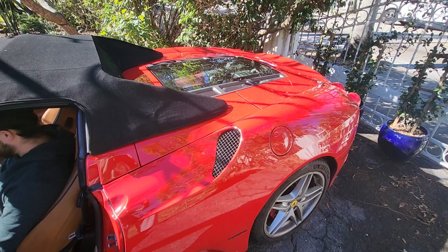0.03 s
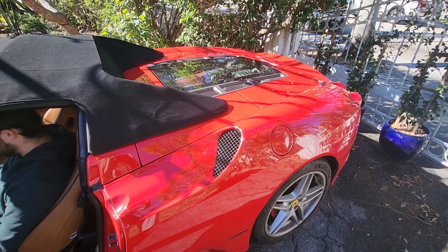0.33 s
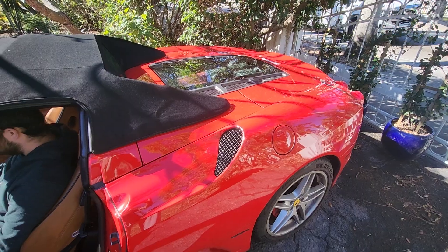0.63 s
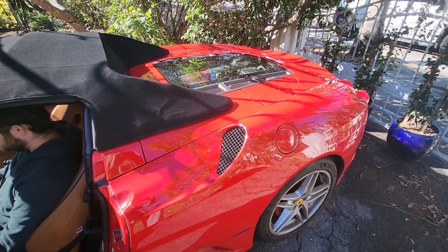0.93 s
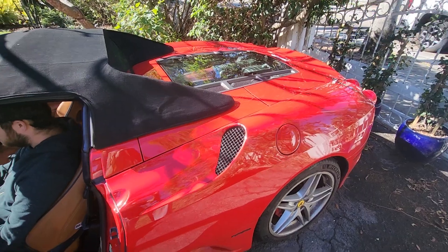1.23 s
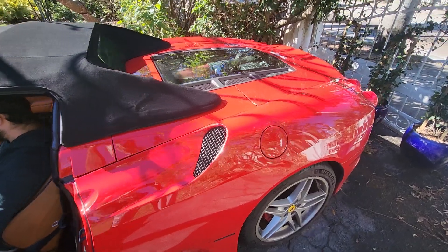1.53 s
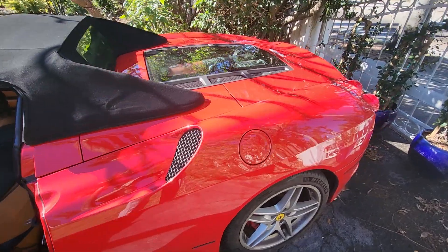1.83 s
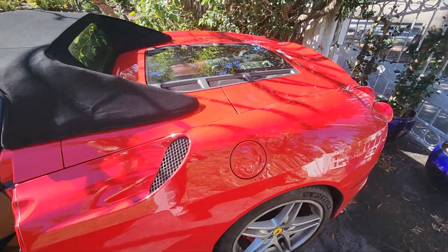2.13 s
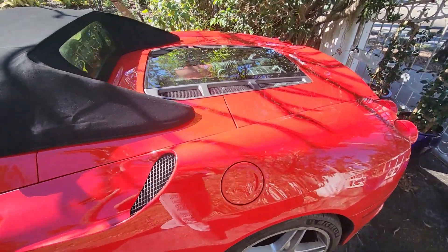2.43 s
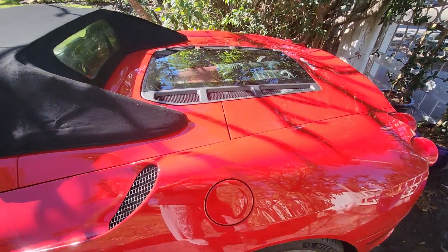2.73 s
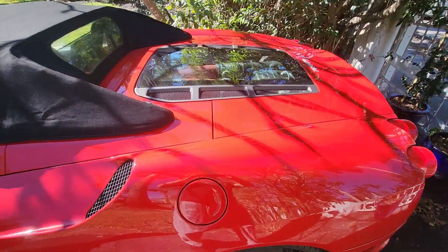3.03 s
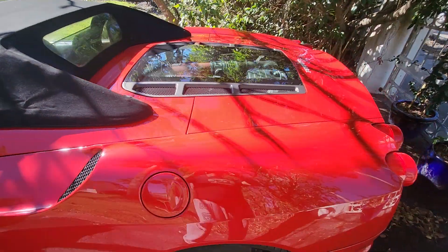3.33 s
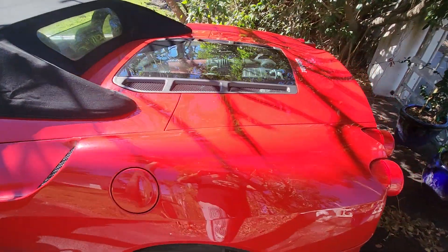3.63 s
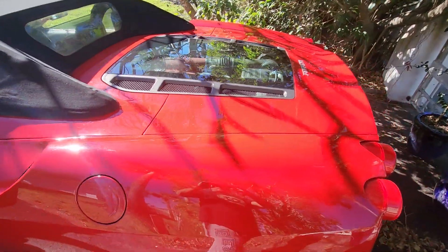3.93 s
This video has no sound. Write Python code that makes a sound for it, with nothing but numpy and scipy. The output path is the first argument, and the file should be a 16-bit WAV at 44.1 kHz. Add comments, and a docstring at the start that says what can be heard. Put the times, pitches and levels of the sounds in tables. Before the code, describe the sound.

A sports car engine starts, heard close to its rear wing. At about 0.1 seconds the starter clacks in and cranks with a fast, pulsing grind and whine. Near 0.8 seconds the first firings thump, and the engine flares with a loud bark around 1 second. By 1.5 seconds it sinks to a steady, droning idle with light hiss and ticking, holding until the end at 4 seconds.

```python
"""A starter clacks in and grinds through eight compressions: a V8 sports car starting from cold
on a driveway, with the microphone beside its rear wing. The first cylinders thump into the exhaust,
then the engine flares with a bark and sinks to a droning idle under the hiss and tick of its valve
gear. One crankshaft speed times the running engine, four firings to a turn."""
import sys
import numpy as np
from scipy import signal
from scipy.fft import rfft, irfft
from scipy.io import wavfile
from scipy.ndimage import uniform_filter1d

SR = 44100
rng = np.random.default_rng(int(sys.argv[2]) if len(sys.argv) > 2 else 0)


def transcribe(signal):
    """Save signal, clipped to [-1, 1], as a 16-bit WAV file at the path in sys.argv[1]."""
    frames = np.atleast_2d(signal).T
    limited = np.clip(frames, -1, 1)
    pcm = np.round(limited * 32767).astype(np.int16)
    wavfile.write(sys.argv[1], SR, pcm)


N = 176400

# crankshaft speed through flare and idle (time [s], speed [turns/s])
CRANK_SPEED = [(.75, 20), (.9, 41.2), (.95, 50.8), (1.03, 52), (1.12, 54.4), (1.2, 50.5), (1.3, 48.9),
               (1.5, 42.4), (1.94, 44.7), (2.06, 42), (2.12, 44.7), (2.6, 44.1), (3.3, 44.3), (4, 43.9)]
# how hard the engine works (time [s], pipe level [dB], rumble level [dB], engine bay level [dB])
ENGINE_EFFORT = [(.72, -70, -39, -38), (.76, -34.5, -23.5, -35), (.89, -33, -24.5, -35.5),
                 (.93, -21.5, -14, -29.5), (.99, -24.5, -12.5, -33), (1.025, -28, -22.5, -37.5),
                 (1.12, -29.5, -30.5, -34), (1.17, -32.5, -21.5, -41), (1.32, -36, -22, -39),
                 (1.65, -37.5, -25, -40), (2.05, -38.5, -28, -41.5), (2.2, -42, -26, -41),
                 (2.9, -44.5, -30, -42), (4, -42, -31, -41)]

STARTER_ON_S, FIRINGS_PER_TURN = 0.069, 4
RUNNING_FADE_S = (1, 1.043)  # drone and tappets come in over this span
PIPE_WIDTH, BAY_WIDTH = 0.5, 1  # side over mid
LOW_PAN_DB, PIPE_PAN_DB, BAY_PAN_DB = 2, 2, 4  # left over right at the microphone


def undb(db):
    """Decibels to gain."""
    return 10 ** (np.asarray(db) / 20)


def unit(x):
    """Scale to rms 1."""
    return x / np.sqrt(np.mean(x ** 2))


def curve(table, column=1):
    """One column of a table, joined by straight lines in time."""
    rows = np.array(table)
    return np.interp(np.arange(N) / SR, rows[:, 0], rows[:, column])


def walk(rate_hz):
    """Smooth random wander with a spread near 1."""
    hold = int(SR / rate_hz)
    steps = np.repeat(rng.standard_normal(N // hold + 1), hold)
    return uniform_filter1d(uniform_filter1d(steps, hold), hold)[:N]


def noise():
    """Two unrelated white noises."""
    return rng.standard_normal((2, N))


def colour(x, outline):
    """Filter by a (frequency [Hz], level [dB]) outline that falls steeply beyond its ends; rms 1."""
    hz, db = np.array(outline).T
    log_f = np.log(np.maximum(np.fft.rfftfreq(2 * N, 1 / SR), 1))
    beyond = np.maximum(np.log(hz[0]) - log_f, 0) + np.maximum(log_f - np.log(hz[-1]), 0)
    response = undb(np.interp(log_f, np.log(hz), db) - 36 * beyond)
    return unit(irfft(rfft(x, 2 * N) * response)[..., :N])


def ring(x, modes):
    """Ring a set of (frequency [Hz], width [Hz], level [dB]) resonances; rms 1."""
    f = np.maximum(np.fft.rfftfreq(2 * N, 1 / SR), 1)
    response = sum(undb(db) / (1 + 1j * hz / width * (f / hz - hz / f)) for hz, width, db in modes)
    return unit(irfft(rfft(x, 2 * N) * response)[..., :N])


def pulses(phase, scatter_db):
    """A click of random size at each whole step of the phase, and that size held through the cycle."""
    cycle = phase.astype(int)
    size = undb(scatter_db * np.clip(rng.standard_normal(N), -2, 2))[cycle]
    return np.diff(cycle, prepend=0) * size, size


def accents(firings, levels_db):
    """A gain for each firing, in a pattern that repeats every turn."""
    return undb(levels_db)[firings.astype(int) % FIRINGS_PER_TURN]


def cycle_decay(phase, cycles):
    """A decay that restarts at each whole step of the phase."""
    return np.exp(-(phase % 1) / cycles)


def burst(age, length, rise_s, fall_s):
    """Attack, hold and release."""
    return np.clip(age / rise_s, 0, 1) * np.exp(-np.maximum(age - length, 0) / fall_s)


def place(pair, width, pan_db):
    """Mid and side signals to the microphone's left and right."""
    mid, side = pair
    return np.array([mid + width * side, mid - width * side]) * undb([[pan_db / 2], [-pan_db / 2]])


def engine_bay(t, turns, firings):
    """Belts and intake hiss, swelling once a turn; valves tick; loose covers chatter on and off."""
    # hiss of the bay (frequency [Hz], relative level [dB])
    hiss_spectrum = [(470, -10), (800, 0), (1420, -2.5), (2240, -7.5), (2630, -16.5), (3330, -15.5),
                     (4110, -10.5), (6510, -10.5), (7840, -4), (9680, -25.5), (11700, -14.5),
                     (15500, -17.5)]
    # resonances of the loose covers (frequency [Hz], width [Hz], relative level [dB])
    chatter_modes = [(1550, 130, 1), (1973, 390, 0)]
    # brief clatters that lift the whole bay (time [s], level [dB])
    clatters = [(1.194, -38), (1.235, -38), (1.559, -36), (1.775, -43.5), (2.64, -43)]
    _, size = pulses(firings, scatter_db=4)
    ticks = unit(size * accents(firings, (-0.5, 3, 6.5, -9)) * cycle_decay(firings, 0.14))
    hiss = (noise() + undb(-17.5) * ticks * noise()) * (1 + 0.18 * np.cos(2 * np.pi * turns))
    chatter = ring(ring(noise(), chatter_modes), chatter_modes)
    chatter *= undb(-19.5 + 7.5 * np.minimum(walk(26), 2))
    clatter = sum(undb(db) * np.exp(-((t - middle) / 0.013) ** 2) for middle, db in clatters)
    level = np.hypot(undb(curve(ENGINE_EFFORT, column=3) - 2), clatter)
    return level * place(colour(hiss, hiss_spectrum) + chatter, BAY_WIDTH, BAY_PAN_DB)


def tappets(t, firings):
    """Each valve strike rings the cam covers a little differently."""
    # cam cover resonances (frequency [Hz], width [Hz], level [dB])
    cover_modes = [(2083, 82, -54), (3940, 106, -64), (4586, 150, -61)]
    covers = np.zeros((2, N))
    for hz, width, db in cover_modes:
        strikes, _ = pulses(firings, scatter_db=4.5)
        covers += undb(db) * ring(strikes * noise(), [(hz, width, 0)])
    return place(covers * np.interp(t, RUNNING_FADE_S, [0, 1]), BAY_WIDTH, BAY_PAN_DB)


def squeaks(t):
    """Belts and covers chirp briefly as the engine shakes: narrow, scratchy tones that slide."""
    # chirps (middle [s], length [s], pitch [Hz], slide [Hz/s], level [dB])
    chirps = [(0.857, .025, 1670, 4007, -27.5), (0.97, .014, 4800, 10, -28.5), (.988, 0.014, 1856, -2, -26),
              (1.27, .08, 1860, -2, -38.5), (1.562, 0.045, 1300, -9000, -39), (3.61, 0.016, 2030, 3, -37)]
    grips_per_s = 510
    out = np.zeros((2, N))
    for middle, length, hz, slide, db in chirps:
        phase = 2 * np.pi * np.cumsum(hz + slide * np.clip(t - middle, -length, length)) / SR
        scratch = np.array([walk(grips_per_s) * np.cos(phase) + walk(grips_per_s) * np.sin(phase)
                            for _ in range(2)])
        out += undb(db) * np.exp(-(2 * (t - middle) / length) ** 2) * scratch
    return place(out, BAY_WIDTH, BAY_PAN_DB)


def starter(t):
    """The solenoid clacks; at each compression the teeth bite, grind and whine down; pistons pump air."""
    # load on the starter (start [s], length [s], level [dB], first tooth rate [Hz], whine share [0-1])
    compressions = [(0.111, 0.05, -1.5, 1251, 0.61), (0.208, 0.035, 0, 1405, 0.48),
                    (0.287, 0.038, 0, 1474, .6), (0.357, 0.038, -0.5, 1444, 0.54),
                    (0.432, .043, -1, 1481, 0.56), (0.509, .046, 0, 1383, 0.18),
                    (0.587, 0.045, 0, 1431, 0.45), (0.669, 0.045, 0, 1423, .5)]
    # starter and bell housing resonances (frequency [Hz], width [Hz], relative level [dB])
    housing_modes = [(517, 120, -10), (967, 20, 4.5), (1101, 15, 9.5), (1302, 41, 4.5), (1950, 230, -11),
                     (2390, 30, -3), (3240, 26, 0), (3650, 65, -6), (4290, 50, -6)]
    # tooth scrape, gear whine, hard tooth strikes, pumped air (frequency [Hz], relative level [dB])
    grind_spectrum = [(400, -42), (511, -7), (873, -4), (957, 2), (1300, -2.5), (1660, -5), (2030, -6.5),
                      (2840, -14.5), (4420, -11.5), (6280, -16.5), (7910, -15), (9500, -35), (12500, -30),
                      (15500, -40)]
    whine_spectrum = [(900, 18), (1300, 0), (2100, 12), (2650, -10), (3300, 7.5), (4500, -23), (6000, -10),
                      (8000, -32)]
    bite_spectrum = [(4400, 7), (8000, -12.5), (9500, -18), (12500, -4.5)]
    chug_spectrum = [(20, 3), (32, 1.5), (70, 0.5), (120, -2.5), (220, -9), (380, -18), (550, -13),
                     (850, -18.5), (1600, -41)]
    load_sag_db_per_s, tooth_sag_hz_per_s, load_fall_s = 87, 4600, 0.014
    free_tooth_hz, free_load_db, off_s, release_s = 1551.0, -12, 0.76, 0.27
    load, whine_level, tooth_hz = np.zeros(N), np.zeros(N), np.full(N, free_tooth_hz)
    for start, length, db, hz, whine_share in compressions:
        age = np.maximum(t - start, 0)
        stroke = burst(age, length, rise_s=0.013, fall_s=load_fall_s)
        stroke *= undb(db - load_sag_db_per_s * age)
        load += stroke
        whine_level += whine_share * stroke
        loaded = (age > 0) & (age < length + load_fall_s)
        tooth_hz = np.where(loaded, hz - tooth_sag_hz_per_s * age, tooth_hz)
    mesh = np.cumsum(tooth_hz * (1 + 0.014 * walk(900))) / SR  # pinion teeth on the flywheel
    teeth, _ = pulses(mesh, scatter_db=0)
    scrape = noise() * cycle_decay(mesh, 0.96)
    grind = undb(-30.5) * ring(scrape, housing_modes) + undb(-27.5) * colour(scrape, grind_spectrum)
    whine = undb(-22.5) * colour(teeth, whine_spectrum) * whine_level
    bite = undb(-34.5) * colour(scrape, bite_spectrum) * load ** 2
    clack = undb(-13) * np.exp(-np.maximum(t - STARTER_ON_S, 0) / 0.033)
    gears = grind * (np.hypot(load, undb(free_load_db)) + clack) + bite
    gears += np.array([whine, np.roll(whine, 90)])  # a late side signal widens the whine
    chug = undb(-25) * colour(noise(), chug_spectrum) * (1 + 0.24 * (load - 0.5))
    engaged = np.exp(-np.maximum(t - off_s, 0) / release_s)
    return engaged * (place(gears, width=0.83, pan_db=3.5) + place(chug, width=0.11, pan_db=LOW_PAN_DB))


def first_firings(t):
    """Each first firing is a pressure thump that dies away in the silencer."""
    # cylinders catching (time [s], level [dB])
    catches = [(0.7567, -0.5), (0.803, -0.5), (0.833, -5.5), (0.875, -4), (0.913, -1.5), (0.932, -5),
               (0.954, -7.5)]
    # silencer resonances (frequency [Hz], decay [s], relative level [dB])
    silencer_modes = [(36, 0.027, -14), (72.5, 0.013, 4), (114.6, 0.01, -2), (209, 0.01, -11)]
    thumps = np.zeros(N)
    for start, db in catches:
        age = np.maximum(t - start, 0)
        attack = 1 - np.exp(-age / 0.0028)
        for hz, decay, mode_db in silencer_modes:
            thumps -= undb(db + mode_db) * np.sin(2 * np.pi * hz * age) * np.exp(-age / decay) * attack
    return place([thumps, np.zeros(N)], width=0, pan_db=LOW_PAN_DB)


def exhaust(firings):
    """Uneven firings and their puffs of gas ring the pipes, rumble in the silencer, rasp at the outlet."""
    # exhaust pipe resonances (frequency [Hz], width [Hz], relative level [dB])
    pipe_modes = [(275, 27, -22), (329, 18, 14), (466, 15, 13.5), (558, 31, 17), (614, 35, 9.5),
                  (675, 12, -5.5), (840, 27, -11)]
    # blow-down hiss and silencer rumble (frequency [Hz], relative level [dB])
    rasp_spectrum = [(600, -29), (1000, -41), (1600, 3), (2150, -3), (2700, -16), (5000, -6.5), (9000, -50)]
    rumble_spectrum = [(24, -7), (36, 2), (70, -5), (130, -13), (200, -1), (310, -12), (390, -22.5),
                       (700, -24)]
    clicks, size = pulses(firings, scatter_db=1.5)
    strength = accents(firings, (5, -1, 0.5, -2.5))
    puffs = unit(strength * size * cycle_decay(firings, 1))
    mid, side = 0.97 * puffs * noise()
    mid += 0.4 * unit(clicks * strength)
    side = unit(side) * np.std(mid)
    drive = signal.sosfilt(signal.butter(2, 260, "high", fs=SR, output="sos"), [mid, side])
    pipes = place(ring(drive, pipe_modes), PIPE_WIDTH, PIPE_PAN_DB)
    rasp_level = undb(-12 + 5.5 * walk(24.3))
    rasp = rasp_level * place(colour(puffs * noise(), rasp_spectrum), width=1, pan_db=PIPE_PAN_DB)
    rumble = place(colour(puffs * noise(), rumble_spectrum), width=0.17, pan_db=LOW_PAN_DB)
    rumble *= undb(curve(ENGINE_EFFORT, column=2))
    return (pipes + rasp) * undb(curve(ENGINE_EFFORT, column=1)) + rumble


def barks(t, firings):
    """Under load in the flare the firings steepen into cracks, one cylinder loudest in each turn."""
    # surges of the flare (start [s], length [s], level [dB])
    surges = [(0.91, 0.075, -30), (1.047, 0.059, -21)]
    # tone of the bark (frequency [Hz], relative level [dB])
    bark_spectrum = [(120, -12), (300, 1), (390, -10), (450, -4.5), (495, -21), (555, 8), (610, -0.5),
                     (790, -1), (900, -10), (1020, -31), (1500, -23), (2000, -20.5)]
    loud_firing_s = 1.078  # the pattern is shifted so that the loudest cylinder fires here
    firings = firings + FIRINGS_PER_TURN - np.interp(loud_firing_s, t, firings) % FIRINGS_PER_TURN
    clicks, _ = pulses(firings, scatter_db=1.5)
    strength = accents(firings, (4.5, -5, -12, -12))
    gas = 0.82 * unit(strength * cycle_decay(firings, 0.61)) * noise()
    crack = unit(clicks * strength)
    bark = colour(gas + np.array([crack, np.roll(crack, 40)]), bark_spectrum)
    effort = sum(undb(db) * burst(t - start, length, rise_s=0.018, fall_s=0.04)
                 for start, length, db in surges)
    return effort * place(bark, PIPE_WIDTH, PIPE_PAN_DB)


def drone(t, turns):
    """The regular part of the exhaust pulses: crank orders, rough in the flare and clean at idle."""
    # exhaust tones (order [cycles/turn], flare [dB], settling [dB], idle [dB], nearer the tail [dB])
    crank_orders = [(1, -8, -6.5, -11, -4.5), (2, -1, -7, -9.5, -11.5), (2.5, -24, -41, -24, -33),
                    (3, -7.5, -4, -5.5, -4.5), (3.5, -29, -35, -20, -17), (4, -6, -2.5, 1, .5),
                    (5, -13, -52, -21.5, -26), (6, -19.5, -11.5, -12.5, -11), (8, -28, -27, -36, -19.5),
                    (10, -22, -31.5, -24, -20)]
    stages_s = (1.118, 1.448, 2.402, 3.9)  # when each level column holds
    left_lag_s = 0.00018  # the pulses reach the left of the microphone late
    heard_turns = np.array([turns - left_lag_s * curve(CRANK_SPEED), turns]) + 0.009 * walk(140)
    rough_db = np.interp(t, stages_s[:2], [4, 0])
    smear = np.interp(t, stages_s[:2], [-0.038, -0.1533])  # the silencer spreads each pulse in time
    out = np.zeros((2, N))
    for order, *stage_db in crank_orders:
        db = np.interp(t, stages_s, stage_db)
        waver_db = np.interp(db, [-22, -8], [1.1, 0.2]) + rough_db  # weak orders waver more
        pan_db = min(order, PIPE_PAN_DB) * np.array([[0.5], [-0.5]])
        phase = 2 * np.pi * order * heard_turns - smear * order ** 2
        out -= undb(db + pan_db + waver_db * walk(39.96)) * np.cos(phase)
    return out * np.sqrt(2) * undb(-17) * np.interp(t, RUNNING_FADE_S, [0, 1])


def scene():
    """The car from beside its rear wing: starter, first firings, then the running engine."""
    t = np.arange(N) / SR
    turns = np.cumsum(curve(CRANK_SPEED) * (1 + 0.0035 * walk(25))) / SR
    firings = turns * FIRINGS_PER_TURN
    car = starter(t) + first_firings(t) + drone(t, turns) + exhaust(firings) + barks(t, firings)
    car += engine_bay(t, turns, firings) + tappets(t, firings) + squeaks(t)
    return car * np.clip((t - STARTER_ON_S) / 0.00025, 0, 1)  # complete silence, then the sound starts abruptly


def record(dry):
    """The microphone thins the deepest bass; the recorder caps the peaks and cuts the top."""
    low_cut = signal.butter(2, 29.4, "high", fs=SR, output="sos")
    top_cut = signal.ellip(10, 0.2, 80, 15900, fs=SR, output="sos")
    capped = np.clip(signal.sosfilt(low_cut, dry), -1, 1)
    return signal.sosfilt(top_cut, capped)


dry = scene()
out = record(dry)
transcribe(out)
```